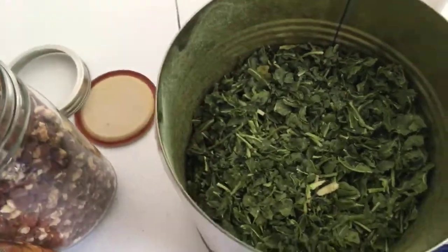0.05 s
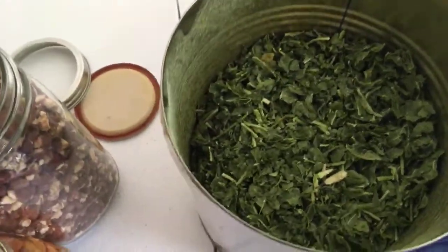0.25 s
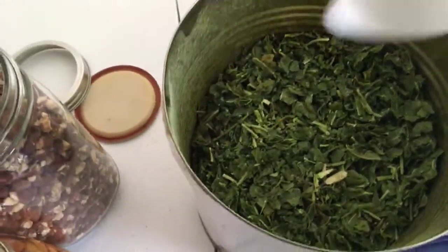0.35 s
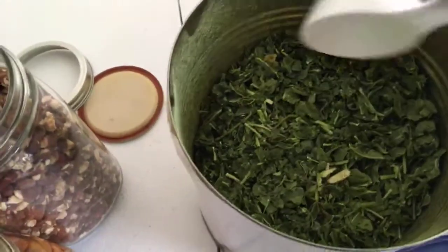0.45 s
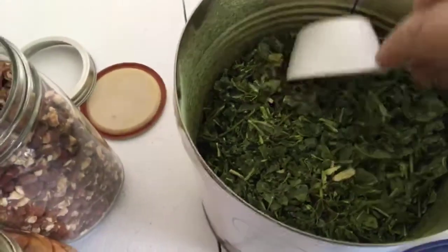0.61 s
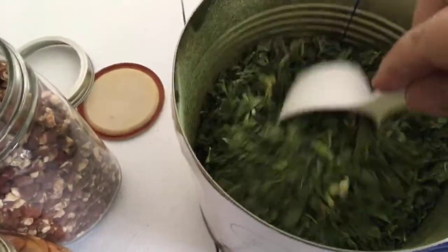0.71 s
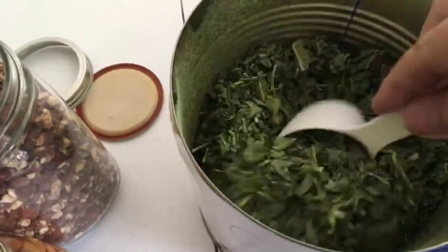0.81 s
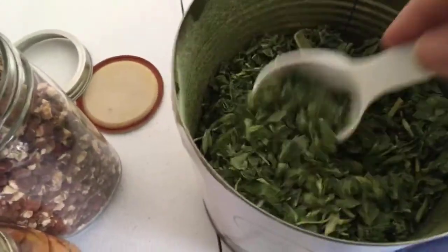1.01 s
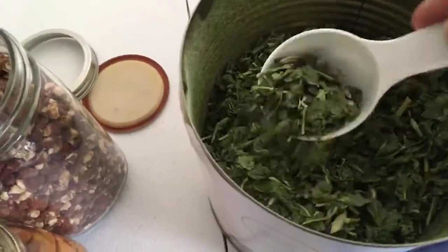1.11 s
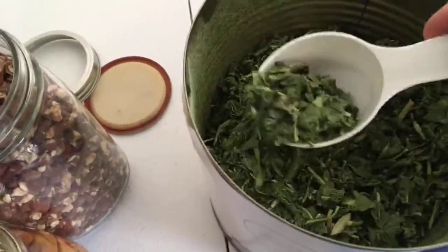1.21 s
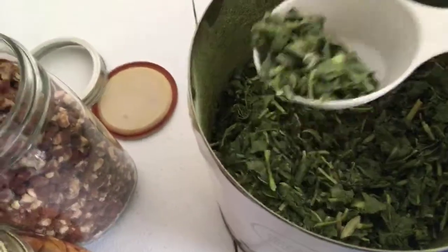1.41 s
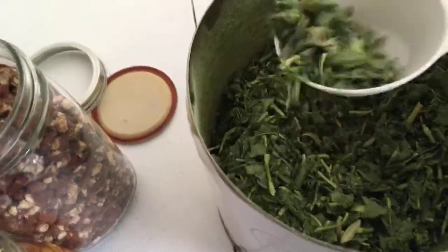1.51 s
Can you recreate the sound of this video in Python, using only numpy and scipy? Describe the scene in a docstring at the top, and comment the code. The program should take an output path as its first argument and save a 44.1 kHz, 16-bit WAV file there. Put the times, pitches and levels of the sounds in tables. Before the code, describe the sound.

Dry leaves rustle and crunch in a metal can, close up in a quiet room. At 0.2 seconds a plastic scoop knocks lightly against the can. The crisp crackle is loudest from 0.3 to 0.5 seconds, over a faint hollow boom, and thins to tiny snaps by 1 second. A softer rustle follows from 1.2 to 1.5 seconds as the scoop lifts and shakes.

```python
"""Scooping dried leaves from a tin

A plastic scoop knocks into a tin can of freeze-dried leaves, digs in, lifts out and shakes.
The brittle leaves rustle as a dense train of tiny cracks, and a few snap alone. Knocks and shifting
leaves excite the modes of the can, which rings and booms; light taps excite those of the scoop.
Beneath lie the hum of a quiet room, a faint hiss, a low wavering tone and a brief rub."""
import sys
import numpy as np
from scipy import signal
from scipy.fft import rfft, irfft, next_fast_len
from scipy.io import wavfile
from scipy.ndimage import uniform_filter1d

SR = 44100
rng = np.random.default_rng(int(sys.argv[2]) if len(sys.argv) > 2 else 0)


def inscribe(sig):
    """Save sig as 16-bit PCM at rate SR to the path in sys.argv[1].

    A 1-D sig is mono; a 2-D sig holds one channel per row.
    Samples are clipped to [-1, 1] before scaling.
    """
    pcm = np.round(np.clip(np.atleast_2d(sig).T, -1, 1) * 32767)
    wavfile.write(sys.argv[1], SR, pcm.astype(np.int16))


N = 68355

# spectrum of leaf cracks heard out of the can: f/Hz, relative spectral level/dB
LEAF_SPECTRUM = [(700, -57), (1400, -27), (2000, -19.5), (2300, -20), (2800, -16.5), (3600, -12.5),
                 (5000, -14), (5900, -6.5), (6800, -8), (9000, -3.5), (10300, -4.5), (11500, -0.5),
                 (14000, 1), (15300, 1)]


def amp(db):
    """Amplitude ratio of a level in decibels."""
    return 10 ** (np.asarray(db) / 20)


def unit_rms(x):
    """Normalisation to unit mean power."""
    return x / np.sqrt(np.mean(x ** 2) + 1e-20)


def in_time(rows):
    """Linear interpolation of rows (t/s, values...) to one curve per value column."""
    times, *columns = np.transpose(rows)
    return [np.interp(np.arange(N) / SR, times, column) for column in columns]


def butterworth(x, order, hz, kind="low"):
    """Filtering with a maximally flat passband."""
    return signal.sosfilt(signal.butter(order, hz, kind, fs=SR, output="sos"), x)


def colour(x, spectrum):
    """Spectral shaping by rows (f/Hz, level/dB) that preserves the power of white noise."""
    hz, db = np.transpose(spectrum)
    size = next_fast_len(N + 4096)
    bin_hz = np.arange(size // 2 + 1) * SR / size
    gain = amp(np.interp(np.log(bin_hz + 1), np.log(hz), db, left=-90))
    return irfft(rfft(x, size) * unit_rms(gain), size)[:N]


def decay(x, tau_s):
    """Exponential relaxation after each impulse."""
    return signal.lfilter([1], [1, -np.exp(-1 / (tau_s * SR))], x + 1e-18)


def resonate(force, modes):
    """Superposition of damped modes (f/Hz, level/dB, T60/s), neighbours in opposite phase."""
    out = 0
    for k, (hz, db, t60) in enumerate(modes):
        radius, angle = amp(-60 / (t60 * SR)), 2 * np.pi * hz / SR
        feedback = [1, -2 * radius * np.cos(angle), radius * radius]
        out = out + (-1) ** k * amp(db) * signal.lfilter([0, np.sin(angle)], feedback, force + 1e-18)
    return out


def impulses(rows):
    """One ideal impulse per row (t/s, level/dB)."""
    out = np.zeros(N)
    for s, db in rows:
        out[int(s * SR)] += amp(db)
    return out


def room():
    """Band-limited background noise: a hum that swells as the can is handled, and a soft middle band."""
    # room hum: f/Hz, relative spectral level/dB
    hum_spectrum = [(15, -77), (30, -14.5), (50, -5.5), (82, -5.5), (125, -4), (199, -5.5), (295, -11.5),
                    (452, -18), (565, -31), (810, -49), (882, -46), (1500, -23), (1950, -28), (3300, -120)]
    # envelopes of the hum and the middle band: t/s, level/dB
    hum_levels = [(0.0, -60.5), (0.038, -70.5), (0.168, -67), (0.214, -65), (0.296, -52), (0.318, -48.5),
                  (0.41, -59), (0.436, -55), (0.586, -59), (0.626, -61), (0.91, -68.5), (1.41, -69.5),
                  (1.432, -69), (1.55, -68.5)]
    middle_levels = [(0.0, -66.5), (0.224, -68), (0.4, -61.5), (0.482, -63.5), (0.556, -62), (1.108, -80),
                     (1.424, -90), (1.55, -69.5)]
    hum = colour(rng.standard_normal(N), hum_spectrum)
    middle = unit_rms(butterworth(rng.standard_normal(N), 2, (403, 701), "band"))
    return amp(in_time(hum_levels)[0]) * hum + amp(in_time(middle_levels)[0]) * middle


def hiss():
    """Amplitude-modulated broadband noise that swells faintly before the scoop lands and as it digs."""
    # envelope: t/s, level/dB
    levels = [(0, -63.5), (.04, -57.5), (.075, -72), (.11, -79), (.138, -59.5), (.19, -67.5), (.3, -56),
              (1.14, -71), (1.55, -72.5)]
    # colour of the hiss: f/Hz, relative spectral level/dB
    spectrum = [(470, -55), (800, -57), (894, -10), (1330, -7), (1640, -22.5), (1900, -8), (2590, -9),
                (2890, -11), (4450, -20), (5360, -6), (6140, -15), (15300, -12.5)]
    return amp(in_time(levels)[0]) * colour(rng.standard_normal(N), spectrum)


def rustle():
    """Shot noise of brittle fracture: tiny cracks of uneven size over a smoother wash of far leaves."""
    # movement of the leaves: t/s, level/dB
    movement = [(.19, -60.5), (.2045, -62), (.2062, -39), (.212, -62), (.235, -41), (.248, -41),
                (.252, -50), (.273, -49), (.282, -48), (.284, -39), (.293, -33), (.325, -25), (.345, -26.5),
                (.377, -31.5), (.39, -29.5), (.407, -28), (.4195, -34), (.4225, -22.5), (.445, -27.5),
                (.457, -26), (.474, -28), (.492, -33), (.521, -34), (.55, -33), (.58, -34), (.612, -38),
                (.7, -39), (.82, -41), (.85, -44.5), (.9, -45.5), (.95, -47.5), (.98, -45.5), (1.0, -51.5),
                (1.045, -56), (1.06, -50), (1.075, -57), (1.1, -58), (1.115, -56), (1.14, -64),
                (1.155, -55), (1.195, -48.5), (1.21, -52.5), (1.234, -44), (1.255, -48.5), (1.274, -35),
                (1.295, -37.5), (1.32, -47), (1.336, -41.5), (1.36, -46), (1.382, -38.5), (1.418, -44),
                (1.47, -48), (1.51, -47.5), (1.525, -49), (1.55, -53.5)]
    # leaves packed against the tin: f/Hz, relative spectral level/dB
    packed_spectrum = [(400, -58), (560, -25), (750, -17.5), (960, -10), (1350, -19), (1680, -8.5),
                       (2100, -12), (3000, -8), (6000, -17.5)]
    # depth of the dig, as packed against loose leaves: t/s, level/dB re packed_offset_db
    depth = [(.2, 7.5), (.276, -8), (.296, -4.5), (.33, 1.5), (.38, 1.5), (.43, 1), (.47, -3), (.52, -2.5),
             (.6, 0.5), (.7, -3), (.82, -4), (1.0, -6), (1.16, -6), (1.27, -14), (1.36, -28), (1.4, -7),
             (1.55, -0.5)]
    # resonance of the lifted scoop's cup, driven by sliding leaves: t/s, level/dB re loose leaves
    cup_levels = [(1.15, -53), (1.25, -29), (1.34, -24.5), (1.45, -25), (1.55, -20)]
    cracks_per_s, sparse_below_db = 2400, -46
    wash_share, packed_offset_db = .68, -15.5
    level_db, = in_time(movement)
    activity = amp(0.29 * np.minimum(level_db - sparse_below_db, 0))   # faint movement cracks less often
    sizes = amp(2.0 * np.minimum(rng.exponential(1, N), 5))
    onsets = rng.random(N) < activity * cracks_per_s / SR
    cracks = unit_rms(decay(sizes * onsets, tau_s=0.0005))
    envelope = amp(level_db) * (wash_share + (1 - wash_share) * cracks)
    noise = rng.standard_normal((3, N))
    loose = colour(envelope * noise[0], LEAF_SPECTRUM)
    packed = colour(amp(packed_offset_db + in_time(depth)[0]) * envelope * noise[1], packed_spectrum)
    cup = unit_rms(resonate(noise[2], [(2300, 0, .008)]))
    return loose + packed + amp(in_time(cup_levels)[0]) * envelope * cup


def snaps():
    """Fracture of single leaves: each a Gaussian burst of thin noise with a faint exponential tail."""
    # snaps: centre t/s, relative level/dB, half length/s
    fractures = [(0.2066, -30, 0.0005), (0.2088, -27, 0.001), (0.2261, -30.5, 0.0007),
                 (0.2995, -26.5, 0.0008), (0.3103, -24.1, 0.0006), (0.3199, -22.6, 0.0006),
                 (0.4025, -13.5, 0.0004), (0.408, -17.5, 0.0005), (0.4209, -19.5, 0.0005),
                 (0.4251, -21.5, 0.0009), (0.4285, -20, 0.0006), (0.4559, -24, 0.0008),
                 (0.6516, -32.9, 0.0011), (0.832, -31.2, 0.0004), (0.9566, -40.6, 0.0008),
                 (0.9759, -36.4, 0.0009), (0.9979, -45.5, 0.0008), (1.054, -43.5, 0.0005),
                 (1.0611, -46.6, 0.0007), (1.072, -47.2, 0.0008), (1.0852, -48.0, 0.0008),
                 (1.0918, -42.6, 0.0005), (1.1102, -40, 0.0007), (1.1255, -47.3, 0.0003),
                 (1.1293, -46.8, 0.0004), (1.1478, -44.4, 0.0003), (1.2192, -42.1, 0.001),
                 (1.2272, -41.9, 0.0009), (1.3349, -39.1, 0.0006), (1.3759, -35.7, 0.0009),
                 (1.5159, -34, 0.0006), (1.5211, -36.9, 0.0005), (1.5272, -41.7, 0.0005),
                 (1.5358, -42.1, 0.0004), (1.5381, -42.4, 0.0006)]
    tail_s, tail_db = .004, -18
    t = np.arange(N) / SR
    envelope = np.zeros(N)
    for s, db, half_length in fractures:
        burst = np.exp(-((t - s) / half_length) ** 2)
        tail = amp(tail_db) * (t > s) * np.exp(-np.abs(t - s) / tail_s)
        envelope += amp(db) * (burst + tail)
    noise = butterworth(colour(rng.standard_normal(N), LEAF_SPECTRUM), 1, 2500, "high")
    local_power = uniform_filter1d(noise ** 2, size=24)
    return envelope * noise / np.sqrt(1.3 * local_power + 1e-12)   # the envelope alone sets the strength


def knocks():
    """Impact excitation: the scoop rings the modes of the can, with a thud that the leaves damp."""
    # bumps of the scoop: t/s, relative level/dB, low-pass f/Hz (lower is softer)
    bumps = [(0.2077, -25, 3000), (0.2109, -24.5, 990), (0.2173, -29.5, 900), (0.2304, -33, 1530),
             (.2985, -35, 695), (.421, -38, 1807)]
    # modes of the can: f/Hz, relative level/dB, T60/s
    can_modes = [(206, 0.5, 0.04), (414, -12, 0.05), (340, -3, 0.067), (578, -12, 0.18), (756, -12, 0.04),
                 (887, -10, 0.2), (955, -13.5, 0.26), (1165, -8.5, 0.12), (1390, -8, 0.015),
                 (1608, -13, 0.24), (1810, -6.5, 0.17), (4400, -29, 0.18)]
    # dense damped ring of the filled can: f/Hz, relative spectral level/dB
    thud_spectrum = [(150, -42), (340, -9), (700, -2.5), (1600, -6.5), (2400, -15), (5000, -20.5),
                     (15000, -18.5)]
    force = sum(butterworth(impulses([(s, db)]), 1, soft_hz) for s, db, soft_hz in bumps)
    hits = impulses([row[:2] for row in bumps])
    thud_envelope = decay(hits, tau_s=0.0058) + amp(-7.5) * decay(hits, tau_s=0.026)
    thud = colour(thud_envelope * rng.standard_normal(N), thud_spectrum)
    return 0.56 * resonate(force, can_modes) + amp(-11) * thud


def boom():
    """Forced vibration: random pushes of the shifting leaves drive the floor and wall of the can."""
    # response to the shifting mass: t/s, floor level/dB, wall level/dB
    shifts = [(0.24, -56, -37), (0.261, -49, -55), (0.28, -61, -39), (0.302, -52, -61), (0.333, -51, -49.5),
              (0.384, -52.5, -64), (0.41, -66, -63), (0.431, -60, -59), (0.454, -66, -56),
              (0.474, -54.5, -52), (0.493, -77, -63), (0.572, -80, -72), (0.616, -54.5, -52),
              (0.649, -54, -42.5), (0.692, -55.5, -69), (0.792, -85, -72.5), (0.82, -67, -98)]
    # modes of the floor and the wall: f/Hz, relative level/dB, T60/s
    floor_modes = [(100, -2, 0.06), (131, -6, 0.3)]
    wall_modes = [(187, -3, 0.14), (247, -6, 0.14), (301, 5, 0.25), (338, -1, 0.16), (392, -6, .12)]
    floor_db, wall_db = in_time([(shifts[0][0] - .03, -80, -80), *shifts, (shifts[-1][0] + .16, -95, -95)])
    floor = unit_rms(resonate(rng.standard_normal(N), floor_modes))
    wall = unit_rms(resonate(rng.standard_normal(N), wall_modes))
    return butterworth(amp(floor_db) * floor + amp(wall_db) * wall, 2, 75, "high")


def taps():
    """Free vibration of the scoop after soft contacts, whose force carries little treble."""
    # dull taps: t/s, relative level/dB
    contacts = [(0.8035, -52), (1.4535, -48.5)]
    # modes of the scoop: f/Hz, relative level/dB, T60/s
    scoop_modes = [(230, -5, 0.051), (585, -13.5, 0.31), (630, 8, 0.015), (920, 1.5, 0.017),
                   (1130, 0.5, 0.038)]
    return resonate(butterworth(impulses(contacts), 4, 950), scoop_modes)


def low_tone():
    """Frequency modulation: a soft sine sags and wavers while the scoop is lifted."""
    # course of the tone: t/s, f/Hz, level/dB
    glide = [(1.07, 90.1, -92), (1.11, 84, -72), (1.15, 66, -73), (1.19, 59, -66), (1.23, 67.3, -71),
             (1.29, 54, -68), (1.33, 51.7, -78), (1.39, 65, -61.5), (1.44, 61, -82), (1.48, 53, -70),
             (1.54, 55, -90)]
    hz, db = in_time([(glide[0][0] - .01, glide[0][1], -140), *glide])
    return np.sqrt(2) * amp(db) * np.sin(2 * np.pi * np.cumsum(hz) / SR)


def rub():
    """Narrow-band noise: one resonance gives a faint rub its pitch."""
    # envelope: t/s, level/dB
    levels = [(1.365, -95), (1.378, -70), (1.39, -80), (1.404, -66), (1.413, -73), (1.421, -68),
              (1.44, -71), (1.452, -95)]
    pitch_hz, t60_s = 870, .03
    return amp(in_time(levels)[0]) * unit_rms(resonate(rng.standard_normal(N), [(pitch_hz, 0, t60_s)]))


def scene():
    """Linear superposition of all sources at one point, the same in both channels."""
    impacts = butterworth(knocks() + taps(), 2, 150, "high")
    mono = impacts + rustle() + snaps() + boom() + rub() + hiss() + low_tone() + room()
    return np.array([mono, mono])


def record(dry):
    """Band limiting: the top of the treble falls away in two steep steps."""
    edge_hz, stop_hz = 15400, 16500
    softened = signal.sosfilt(signal.ellip(10, .5, 38, edge_hz, fs=SR, output="sos"), dry)
    return signal.sosfilt(signal.cheby2(14, 60, stop_hz, fs=SR, output="sos"), softened)


dry = scene()
out = record(dry)
inscribe(out)
```